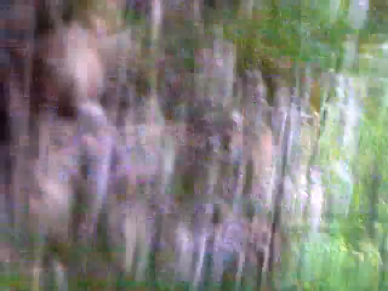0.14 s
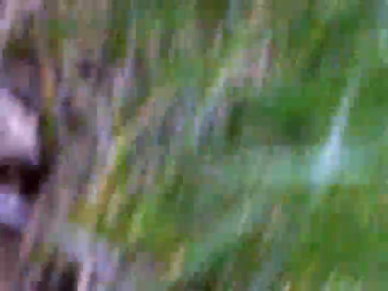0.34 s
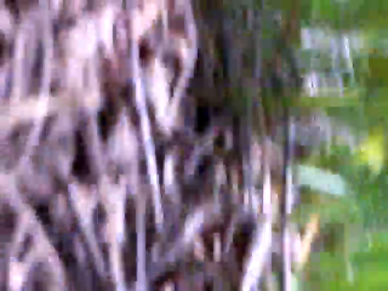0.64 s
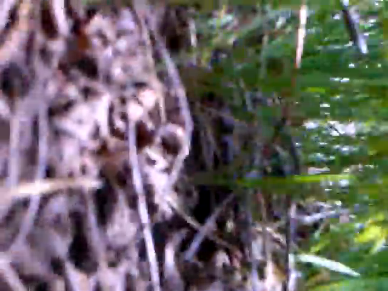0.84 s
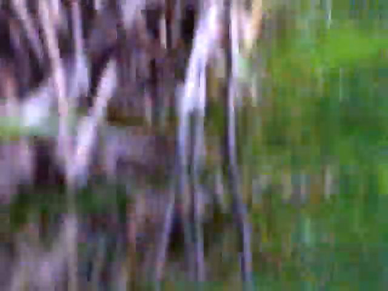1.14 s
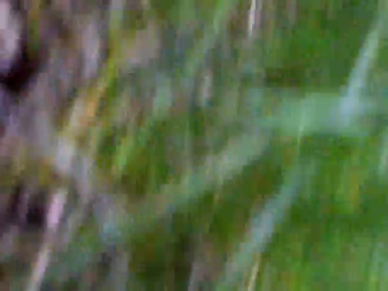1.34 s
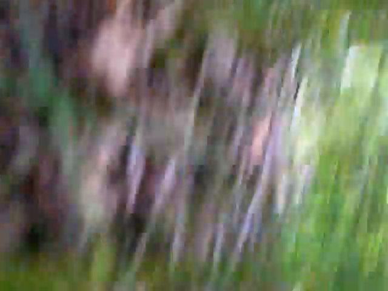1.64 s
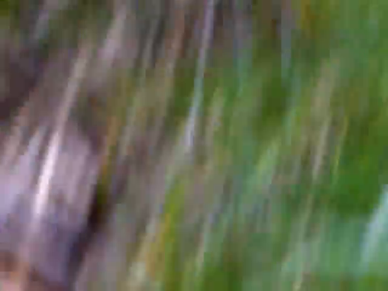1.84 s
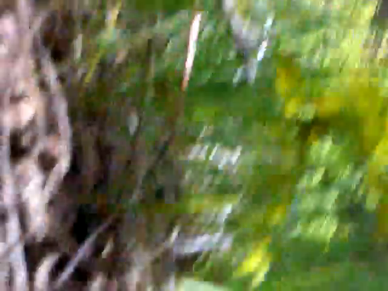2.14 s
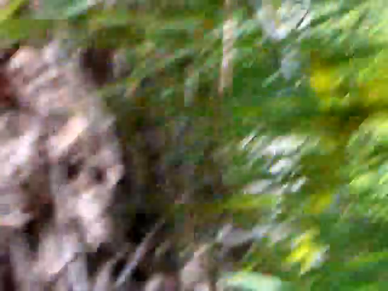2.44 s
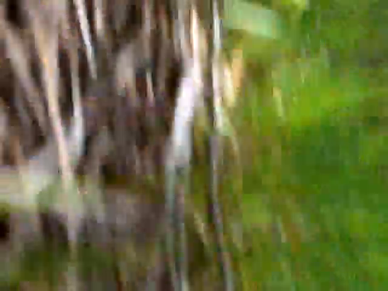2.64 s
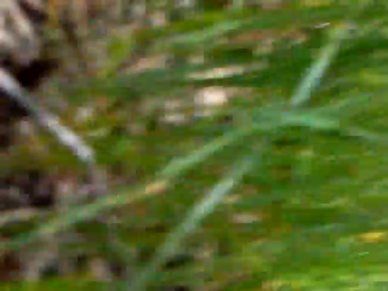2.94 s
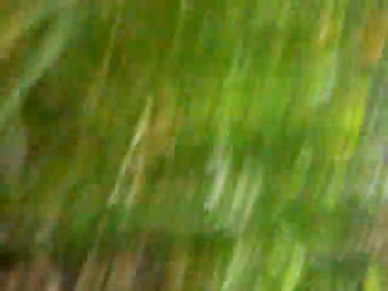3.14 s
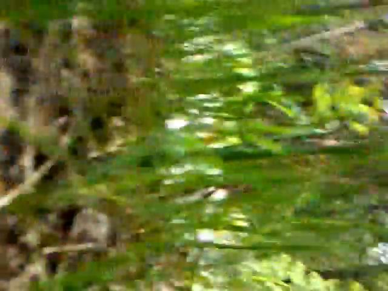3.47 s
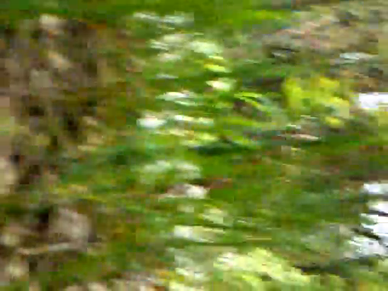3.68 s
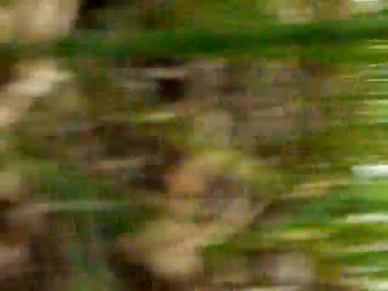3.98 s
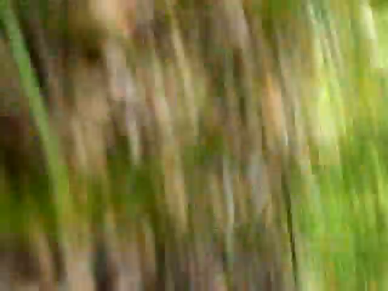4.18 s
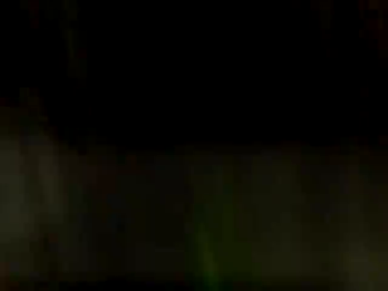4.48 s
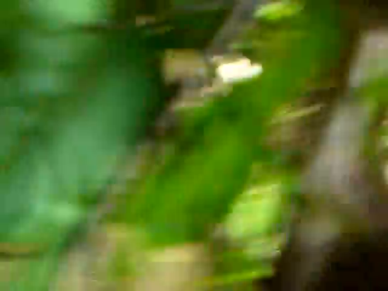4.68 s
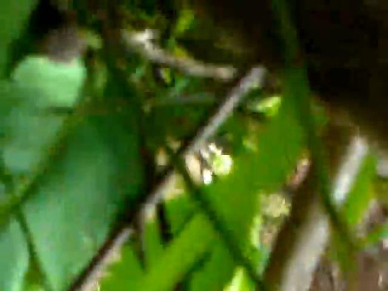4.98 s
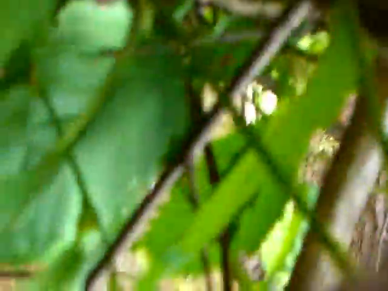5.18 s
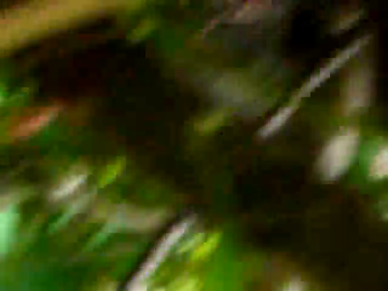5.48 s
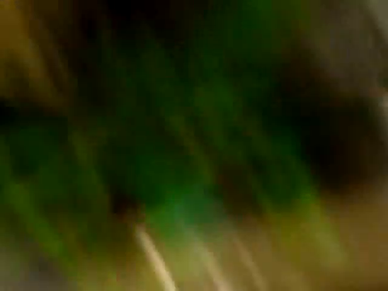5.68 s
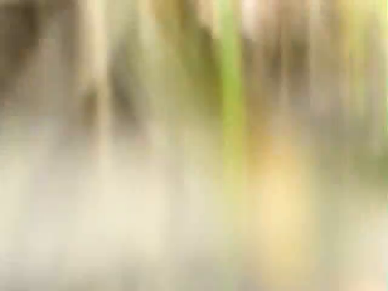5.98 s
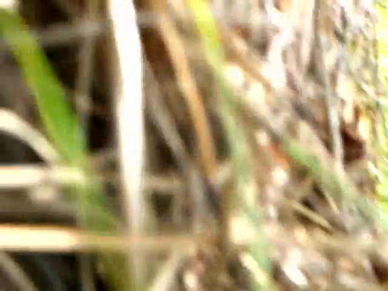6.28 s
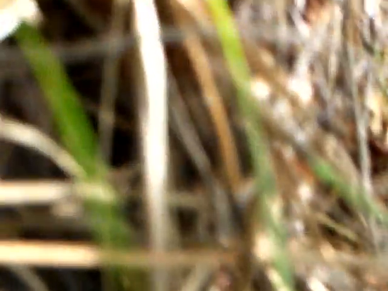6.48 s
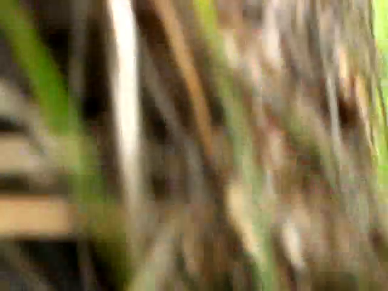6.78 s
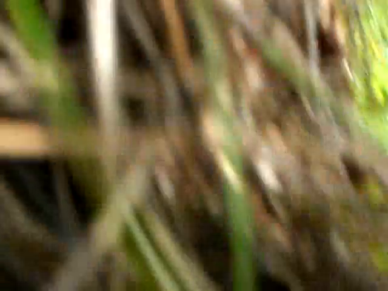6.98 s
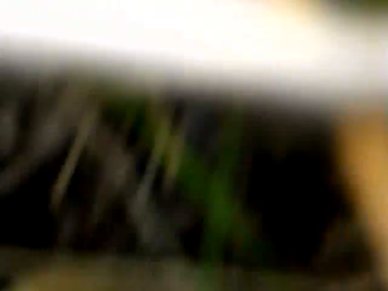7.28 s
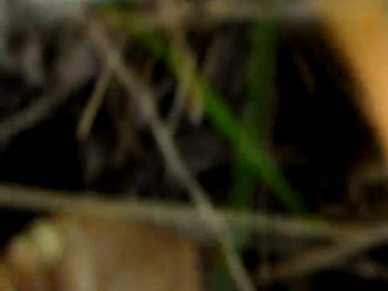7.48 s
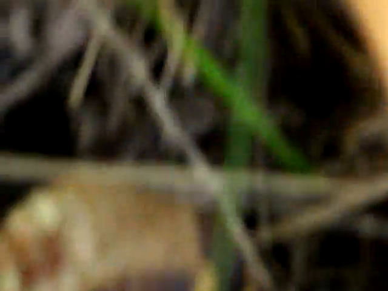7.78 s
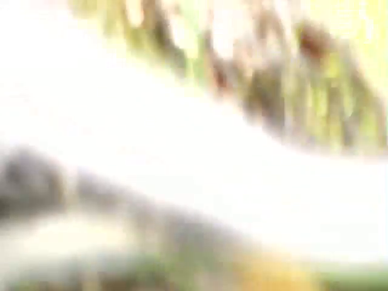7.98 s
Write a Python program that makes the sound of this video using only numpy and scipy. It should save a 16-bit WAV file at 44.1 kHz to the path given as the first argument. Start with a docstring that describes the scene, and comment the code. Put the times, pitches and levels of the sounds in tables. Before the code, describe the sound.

A rattlesnake shakes its tail close to a hand-held microphone in dry grass, making a fast, dry, high buzz that never stops. At first the buzz swells and fades, with two light knocks on the microphone. From about the middle, several harder knocks hit, the loudest briefly pushing the buzz down. A faint low outdoor rush and rumble lies underneath.

```python
"""A rattlesnake in dry grass, close to the microphone of a moving hand-held camera, over low outdoor air.
It buzzes from the start: the hollow horny tail segments collide four times a shake, about sixty shakes
a second. Light knocks on the camera body come early, as the buzz swells and fades with the aim.
From about four to seven seconds harder knocks overload the microphone, and its gain control ducks
the buzz after them. The snake rattles on to the end."""
import sys
import numpy as np
from scipy import signal
from scipy.io import wavfile
from scipy.ndimage import uniform_filter1d

SR = 44100
rng = np.random.default_rng(int(sys.argv[2]) if len(sys.argv) > 2 else 0)


def write(x):
    x = np.atleast_2d(x).T
    wavfile.write(sys.argv[1], SR, np.round(np.clip(x, -1, 1) * 32767).astype(np.int16))


N = 358091
TIME = np.arange(N) / SR


def rattle(facing_db=-22.5, hollow_per_db=0.6):
    """Collisions ring the hollow segments; the colour shifts with the microphone's position."""
    # broad colour of the segments: (frequency [Hz], relative level [dB])
    shell = [(150, -30.5), (500, -17), (1000, -17), (1500, -12), (2100, -5), (3000, -6.5), (3800, -7),
             (4500, -3), (5200, -5.5), (7300, -0.5), (8400, -5), (10100, -6), (11200, -15.5),
             (12200, -30.5)]
    # resonances of the hollow segments: (frequency [Hz], width [Hz], gain [dB])
    cavities = [(2430, 410, 6), (4260, 190, 1), (7050, 820, 2), (9110, 160, 5.5), (9980, 290, 3),
                (6180, 92, 3), (4560, 230, 0), (1424, 130, 3.5)]
    # the microphone swings towards the snake and away: (time [s], level [dB], top treble [dB])
    aim = [(0, -23, 0.5), (.3, -19.5, -4.5), (.6, -26, -2.5), (1.22, -27.5, .5), (1.6, -20, -3.5),
           (2.2, -30, -2.5), (2.8, -22, -6.5), (3.25, -18.5, -3.5), (3.75, -19.5, -5), (4.15, -21.5, 0),
           (4.55, -20.5, 0), (5.3, -21, -1.5), (5.75, -19, -4), (6.0, -20.5, 1), (6.5, -20.5, -4),
           (7.1, -20, -1.5), (7.5, -20.5, -0.4)]
    # the microphone goes round the snake: (time [s], upward tilt of the lower buzz [dB], hollow ring [dB])
    circling = [(0, 4, 1), (1.0, 1, 1), (1.55, 0.2, 1.7), (3.4, 0.5, -1.5), (4.3, 1, 0.5), (5.3, 0.5, -2.5),
                (6.1, -4, 1), (8.1, -2.5, 0.5)]
    # reflections off leaves and ground lift one band: (time [s], frequency [Hz], lift [dB])
    lifted_band = [(0, 6040, 9), (.5, 5700, 7), (1.25, 5670, 12), (1.6, 5560, 9.5), (2.4, 5500, 11),
                   (2.7, 5500, -1), (3.7, 5500, 2), (5.3, 6000, 3.5), (5.7, 6050, 8), (5.95, 5460, 8.5),
                   (6.6, 5460, 7), (8.1, 5500, 6.5)]
    # and cancel another: (time [s], frequency [Hz], depth [dB])
    cancelled_band = [(0, 4370, 5), (.3, 4120, 5), (1.3, 3740, -1), (2.35, 3670, 8), (3.0, 2980, 1.5),
                      (3.7, 3000, 2.5), (3.9, 5330, 9), (4.35, 5300, -1), (4.6, 5150, 6), (5.4, 5030, 3),
                      (5.78, 4700, 16), (6.0, 4870, -2), (6.5, 5900, 1), (8.1, 5740, 2.5)]
    # two middle rings that speak from one side of the snake: (time [s], gain [dB])
    side_rings = [(1.2, 2), (1.6, 5.5), (2.45, 3), (2.75, 7.5), (3.1, 3.5), (3.5, 3)]
    hz, t, spectrum = signal.stft(shifting_contact(collisions()), SR, nperseg=512, noverlap=384)
    hz = hz[:, None]
    level_db, sizzle_db = follow(aim, t)
    tilt_db, ring_db = follow(circling, t)
    lift_hz, lift_db = follow(lifted_band, t)
    cancel_hz, cancel_db = follow(cancelled_band, t)
    side_db, = follow(side_rings, t)
    db = colour(shell, hz) + sum(gain * bell(hz, centre, width) for centre, width, gain in cavities)
    # the hollow ring spreads all round, so it stands out when the rest of the buzz is turned away
    hollow_db = hollow_per_db * (facing_db - level_db) + ring_db
    db = db + hollow_db * bell(hz, 2380, 2000)
    db -= 2.5 * bell(hz, 2800, 120)  # just above its pitch it works against the rest of the shell
    db += tilt_db * (bell(hz, 3040, 1650) - 0.62 * bell(hz, 1980, 920))
    db += sizzle_db * bell(hz, 11200, 4000)
    db += side_db * (bell(hz, 4100, 140) + bell(hz, 4770, 480))
    db += lift_db * bell(hz, lift_hz, 470) - cancel_db * bell(hz, cancel_hz, 440)
    db += leaf_scatter(spectrum.shape) * bell(hz, 8500, 7000)
    core = (hz > 5000) & (hz < 8200)  # this band anchors the level
    gain = amp(db + level_db) / np.sqrt(np.mean(core * amp(db) ** 2))
    return signal.istft(spectrum * gain, nperseg=512, noverlap=384)[1][:N]


def collisions(jitter_s=.00024, scatter_s=.00092, uneven_db=1.24, tick_db=1.55, scrape=1.35, count=20):
    """Each collision runs down the chain of segments as a spray of ticks and a short scrape."""
    # speed of the tail: (time [s], rate [shakes/s])
    shake_rate = [(0, 59.3), (.6, 65), (1.0, 62.5), (2.0, 59.5), (2.55, 61.2), (3.5, 57.9), (4.2, 58),
                  (5.1, 63.2), (5.5, 59.8), (6.0, 60.4), (7.15, 57.5), (7.5, 59.8), (8.1, 61.6)]
    # the four collisions of one shake: (phase [cycles], accent [dB])
    pattern = [(.1, 0.5), (.36, -1.2), (.6, -1), (.845, -1.9)]
    turns = np.cumsum(follow(shake_rate, TIME)[0]) / SR
    phase, accent_db = np.transpose(pattern)
    cycles = np.arange(int(turns[-1]) + 1)
    strike_s = np.interp(np.add.outer(cycles, phase).ravel(), turns, TIME, right=np.inf)
    grit, chatter = rng.standard_normal((2, N))
    # column 0 varies the whole collision, the rest its single ticks
    force, timing, polarity = rng.standard_normal((len(strike_s), 3, count + 1)).swapaxes(0, 1)
    strike_db = np.tile(accent_db, len(cycles)) + uneven_db * np.tanh(force[:, 0])
    strike_s += jitter_s * timing[:, 0]
    tick_s = strike_s[:, None] + scatter_s * timing[:, 1:]
    size = amp(strike_db[:, None] + tick_db * force[:, 1:]) * np.sign(polarity[:, 1:])
    inside = (tick_s > 0) & (tick_s < TIME[-1])
    ticks = np.bincount((tick_s[inside] * SR).astype(int), size[inside], N)
    # the segments rub just before and after they strike, and chatter loosely in between
    rubbing = np.sqrt(abs(uniform_filter1d(ticks ** 2, size=48)))
    return unit(unit(ticks) + scrape * unit(rubbing * grit) + chatter)


def shifting_contact(blows, uneven_db=0.5):
    """The segments never meet at quite the same spot, so each blow favours other pitches."""
    spectrum = signal.stft(blows, SR, nperseg=128)[2]
    spot = unit(blur(rng.standard_normal(spectrum.shape), bins=6, frames=4))
    return unit(signal.istft(spectrum * amp(uneven_db * spot), nperseg=128)[1][:N])


def leaf_scatter(shape, depth_db=1.83):
    """Leaves scatter the sound, so narrow bands swell and fade as the microphone wanders."""
    field = rng.standard_normal(shape)
    for _ in range(2):
        field = blur(field, bins=5, frames=110)
    return depth_db * unit(field)


def knocks(level_db=-2.5, rebound_s=.0408, bass_cut_hz=190):
    """Knocks right at the microphone each bounce once; the small camera body gives off little bass."""
    # blows on the camera: (time [s], relative force [dB], lower ring [Hz], upper ring [Hz],
    # deep modes [dB], rebound [dB])
    blows = [(0.1708, -10, 700, 1160, -12, -25), (1.6573, -9, 710, 1400, -10, -18),
             (3.247, -23.5, 530, 650, 5, -26), (3.8119, 6.5, 1050, 1930, 2, -15.5),
             (3.8171, -7, 1000, 1490, 6, -26), (4.2585, -11.5, 470, 1550, -3.5, -4.5),
             (4.4654, -19.5, 900, 1290, 3, -2), (4.6842, 9, 986, 1750, -3, -7),
             (4.701, 0, 990, 2030, -9, -8), (5.8341, 2, 412, 1690, -10, -10),
             (5.9615, -14, 750, 1000, -1, -13), (6.070, -19, 590, 1300, -15, -4),
             (6.7563, -2.5, 563, 1410, -2.5, -17)]
    out = np.zeros(N)
    for start_s, force_db, lower_hz, upper_hz, deep_db, rebound_db in blows:
        blow = amp(force_db + level_db) * body_ring(lower_hz, upper_hz, deep_db)
        add(out, start_s, blow)
        add(out, start_s + rebound_s, amp(rebound_db) * blow)
    return signal.sosfilt(signal.butter(2, bass_cut_hz, "high", fs=SR, output="sos"), out)


def body_ring(lower_hz, upper_hz, deep_db, focus_db=8.5, deep_edge_hz=630, rise_s=0.0007):
    """One blow rings the camera body; where it lands decides which modes speak most."""
    # modes of the camera body: (frequency [Hz], relative level [dB], time to fall 60 dB [s])
    modes = [(190, -12.5, 0.012), (420, -0.5, 0.0064), (532, -3.5, 0.017), (711, -8.5, 0.021),
             (910, -1.5, 0.0096), (1162, 3.5, 0.0071), (1400, 4, 0.0082), (1724, -3.5, 0.011),
             (1975, -4, 0.01), (3340, 1, 0.0042), (5970, 5.5, 0.0036)]
    t = np.arange(SR // 16) / SR
    hz, db, t60 = np.transpose(modes)[:, :, None]
    rings = amp(db - 60 * t / t60) * np.sin(2 * np.pi * hz * t) * (1 - np.exp(-t / rise_s))
    focus = np.maximum(bell(hz, lower_hz, 260), bell(hz, upper_hz, 550))
    return (amp(focus_db * focus + deep_db * (hz < deep_edge_hz)) * rings).sum(0)


def grip_bump():
    """The hand shifts its grip on the camera with a dull, short thud."""
    # soft bump of the hand: (time [s], level [dB], pitch [Hz], length [s])
    thuds = [(4.457, -24, 148, 0.016)]
    out = np.zeros(N)
    for start_s, db, hz, length_s in thuds:
        t = np.arange(int(length_s * SR)) / SR
        add(out, start_s, amp(db) * np.sin(2 * np.pi * hz * t) * np.hanning(len(t)))
    return out


def background(patchy_db=1.5):
    """A low, patchy outdoor rush, and a deep rumble that swells and fades, early on with the buzz."""
    # colour of the rush: (frequency [Hz], relative level [dB])
    rush = [(20, -12), (50, -1.5), (100, -7), (200, 0.5), (300, 2), (500, 0), (700, -3.5), (1200, -8.5),
            (3000, -8), (10000, -40)]
    # rush and rumble over time: (time [s], level [dB], deep rumble [dB])
    levels = [(0, -37.5, 3), (.8, -36.5, -10), (1.6, -37, 1), (2.4, -35.8, -11), (3.2, -37, -1),
              (4.45, -37.5, 2), (5.7, -38, -1), (6.4, -41.5, 4)]
    hz, t, spectrum = signal.stft(rng.standard_normal(N), SR, nperseg=1024, noverlap=768)
    hz = hz[:, None]
    level_db, rumble_db = follow(levels, t)
    patches = unit(blur(rng.standard_normal(spectrum.shape), bins=5, frames=12))
    db = level_db + rumble_db * bell(hz, 0, 300) + patchy_db * patches
    gain = unit(amp(colour(rush, hz))) * amp(db)
    return signal.istft(spectrum * gain, nperseg=1024, noverlap=768)[1][:N]


def gain_control(x, threshold_db=-15, attack_s=0.0059, recover_db_per_s=27, lag_s=0.0025):
    """The camera turns its gain down within milliseconds above the threshold, then recovers slowly."""
    power_db = 10 * np.log10(lag(x ** 2, attack_s) + 1e-12)
    recovery_db = recover_db_per_s * TIME
    held_db = np.maximum.accumulate(power_db + recovery_db) - recovery_db
    over_db = np.maximum(held_db - threshold_db, 0)
    return x * amp(-lag(over_db, lag_s))  # the gain lags, so the start of a knock gets through


def amp(db):
    """Decibels to gain."""
    return 10 ** (np.asarray(db) / 20)


def unit(x):
    """Scales to rms 1."""
    return x / np.sqrt(np.mean(x ** 2) + 1e-20)


def colour(points, hz):
    """Reads a spectrum in dB on a log-frequency axis."""
    point_hz, db = np.transpose(points)
    return np.interp(np.log(hz + 1), np.log(point_hz), db)


def follow(rows, t):
    """Reads every column of a curve at the times t."""
    times, *columns = np.transpose(rows)
    return [np.interp(t, times, column) for column in columns]


def bell(hz, centre_hz, width_hz):
    """A smooth hump of height 1 with the given half-height width."""
    return 2 ** -((2 * (hz - centre_hz) / width_hz) ** 2)


def blur(field, bins, frames):
    """Averages over neighbouring frequencies and moments."""
    return uniform_filter1d(uniform_filter1d(field, size=bins, axis=0), size=frames, axis=1)


def lag(x, time_s):
    """One-pole smoothing with the given time constant."""
    pole = np.exp(-1 / (time_s * SR))
    return signal.lfilter([1 - pole], [1, -pole], x)


def add(mix, start_s, sound):
    """Mixes a sound in at the given time."""
    part = mix[round(start_s * SR):][:len(sound)]
    part += sound[:len(part)]


def scene():
    """The snake close by, the background and handling noise, in mono."""
    return (rattle() + background() + knocks() + grip_bump())[None]


def record(dry, ceiling=.74, edge_hz=12350):
    """The camera's microphone: narrow dips, gain control, overload and a steep band limit."""
    # dips in the microphone's response: (frequency [Hz], width [Hz])
    dips = [(4350, 124), (6590, 150), (8690, 320)]
    x = dry[0]
    for hz, width in dips:
        x = signal.lfilter(*signal.iirnotch(hz, hz / width, SR), x)
    x = gain_control(x)
    x = x / (1 + (x / ceiling) ** 10) ** (1 / 10)  # overload rounds off the hardest knocks
    low_pass = signal.firwin(401, edge_hz, window=("kaiser", 8), fs=SR)
    return signal.oaconvolve(x, low_pass, "same")[None]


dry = scene()
out = record(dry)
write(out)
```